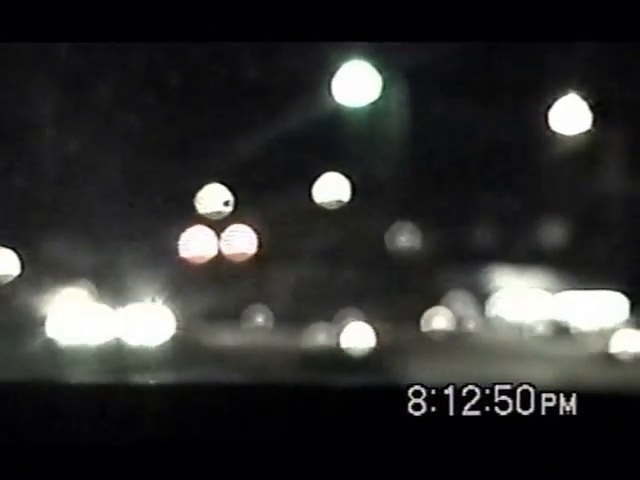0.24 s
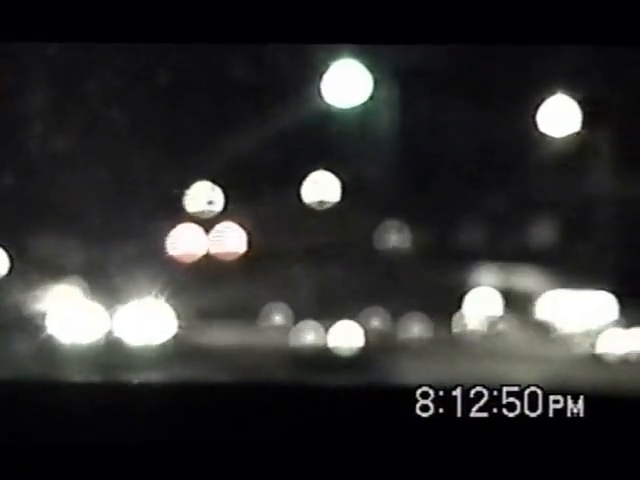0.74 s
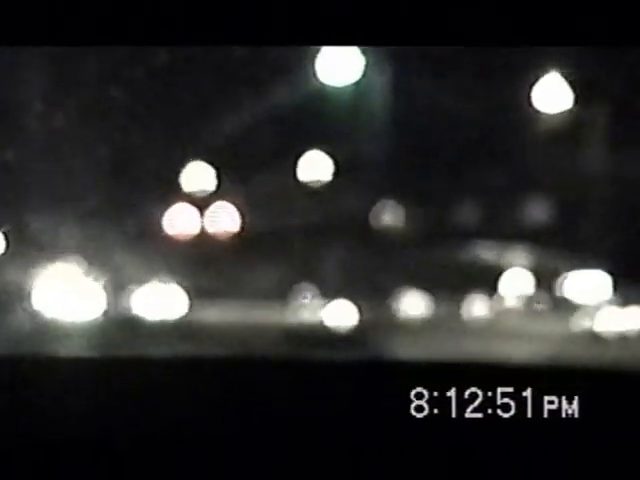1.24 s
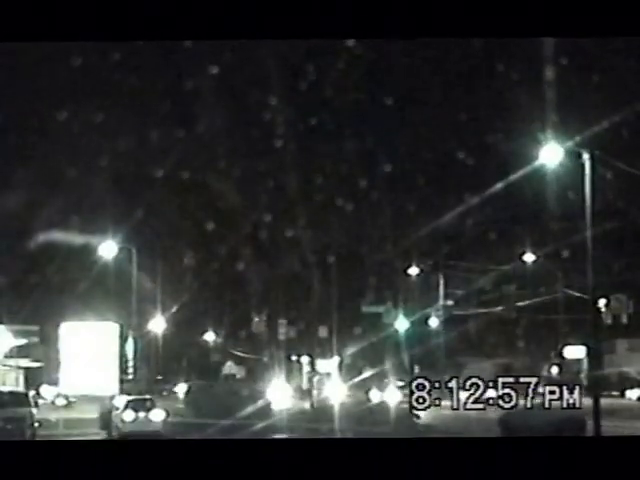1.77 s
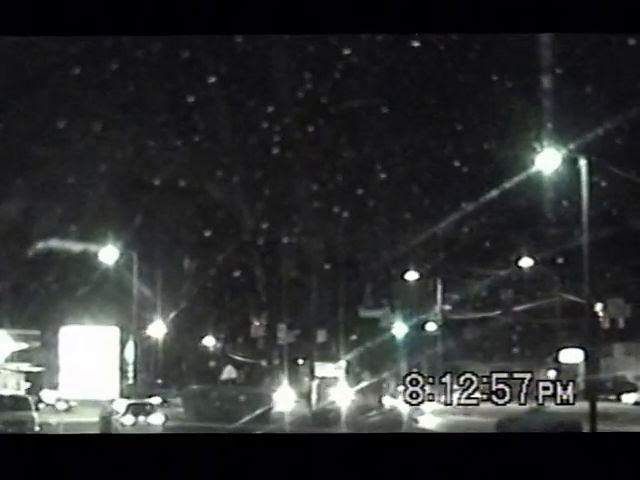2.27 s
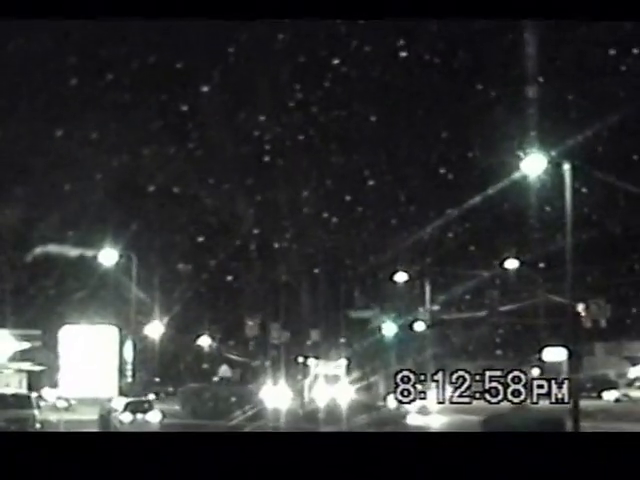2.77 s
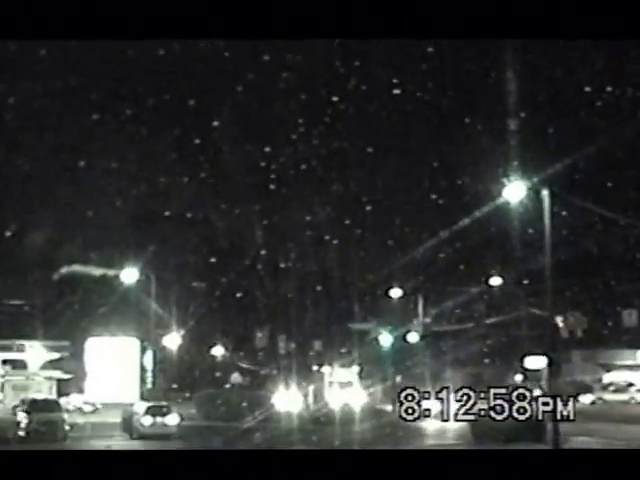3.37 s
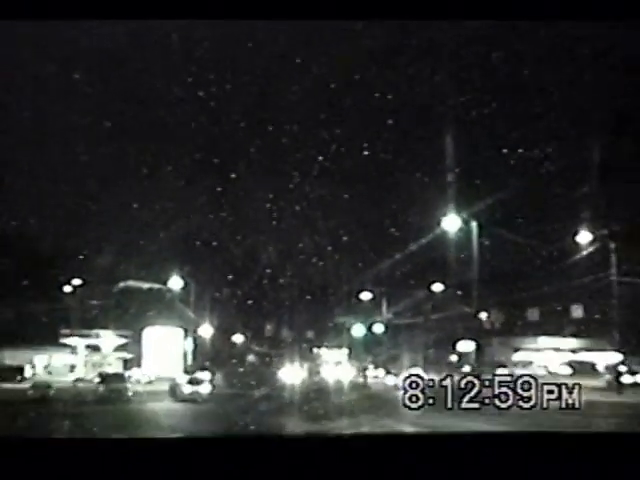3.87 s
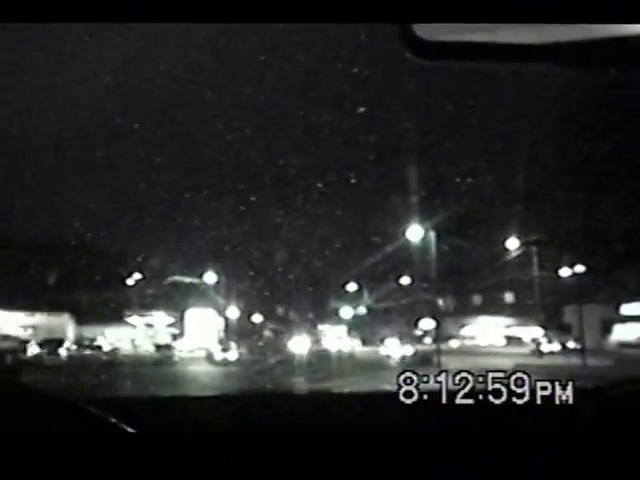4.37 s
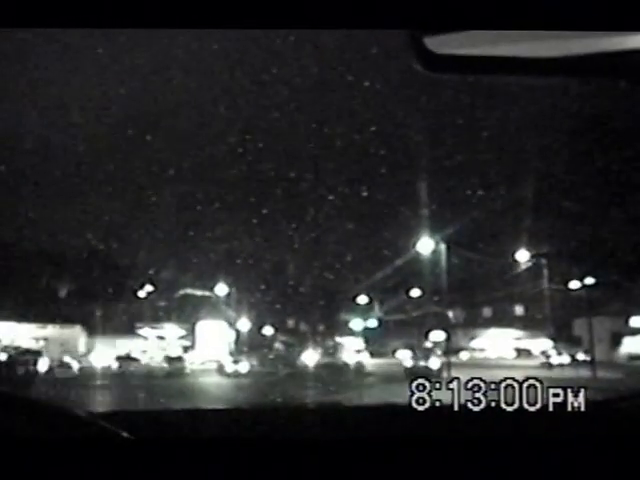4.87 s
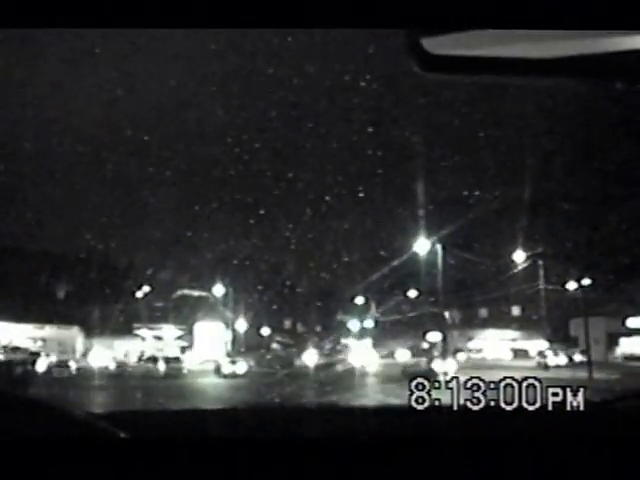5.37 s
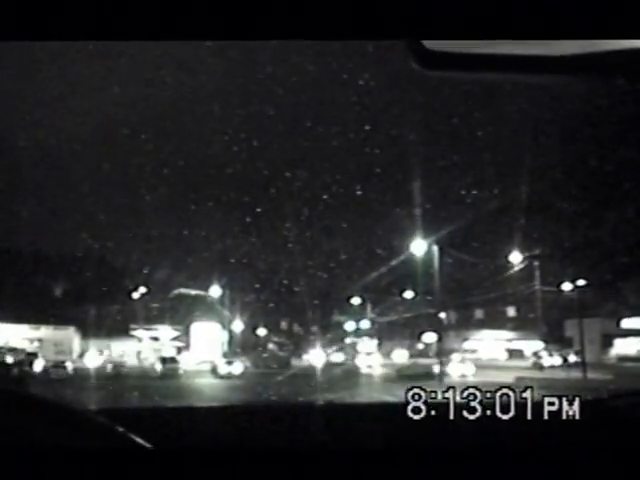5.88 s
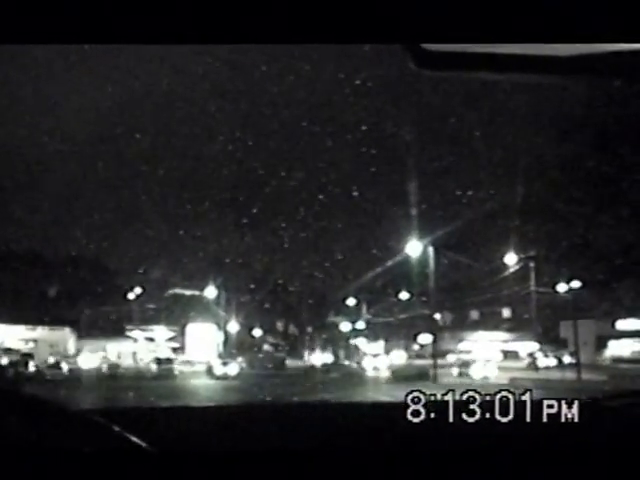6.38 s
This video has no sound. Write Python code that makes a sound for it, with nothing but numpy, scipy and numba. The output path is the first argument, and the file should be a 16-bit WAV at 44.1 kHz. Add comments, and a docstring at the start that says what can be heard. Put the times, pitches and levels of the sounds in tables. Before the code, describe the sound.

Inside a moving car, loud even road roar covers an easing engine hum. Light finger clicks and a dull bump precede an abrupt cut to a quieter drive. The engine climbs and surges with a boomy drone, plastic trim ticks, and sharp clicks snap very close to the microphone near five seconds. Faint hiss and a very high whistle stay underneath.

```python
"""Loud road roar fills a car cabin over an engine hum that eases off; at 1.4 s a second drive takes over.
There the engine climbs and surges, booming at the body's resonances, and another car pulls away.
Road and tyre sounds are coloured noise; hums are sine phases; trim ticks are decaying noise bursts.
Finger clicks ring a plastic camera shell. The camera adds hiss and a whistle, and its gain control ducks."""
import sys
import numpy as np
from scipy import signal
from scipy.fft import rfft, irfft
from scipy.io import wavfile
from numba import njit

SR = 44100
rng = np.random.default_rng(int(sys.argv[2]) if len(sys.argv) > 2 else 0)


def persist_wave(psi):
    """Save psi, clipped to +-1, as 16-bit WAV."""
    counts = np.round(np.clip(psi, -1, 1) * 32767).astype(np.int16)
    wavfile.write(sys.argv[1], SR, np.atleast_2d(counts).T)


N = 291799
TIME = np.arange(N) / SR
FREQ_HZ = np.arange(N // 2 + 1) * SR / N
CHANGE_S = 1.40  # first drive gives way to the second


def undb(db):
    """Decibels to amplitude gain."""
    return 10 ** (np.asarray(db) / 20)


def unit(x):
    """Scale to rms 1."""
    return x / np.sqrt(np.mean(x ** 2))


def curve(rows):
    """Second column of a table, interpolated over the time_s column to every sample."""
    time_s, value = np.transpose(rows)
    return np.interp(TIME, time_s, value)


def walk(rate_hz):
    """Random drift of rms 1: noise under a Gaussian low-pass about rate_hz wide, without DC."""
    lowpass = np.exp(-(FREQ_HZ / rate_hz) ** 2) * (FREQ_HZ > 0)
    return unit(irfft(rfft(rng.standard_normal(N)) * lowpass, N))


def gain_at(points, freq_hz):
    """Gain of a colour table, interpolated in dB over log frequency."""
    point_hz, level_db = np.transpose(points)
    return undb(np.interp(np.log(freq_hz + 1), np.log(point_hz), level_db))


def noise(points, standing=()):
    """Coloured noise of rms 1, with Gaussian peaks and dips for standing waves."""
    ripple_db = sum(db * np.exp(-((FREQ_HZ - hz) / width_hz) ** 2) for hz, width_hz, db in standing)
    spectrum = rfft(rng.standard_normal(N)) * gain_at(points, FREQ_HZ) * undb(ripple_db)
    return unit(irfft(spectrum, N))


def colour(x, points, size=512):
    """Minimum-phase colour filter, via the folded cepstrum, that keeps the power of white noise."""
    cepstrum = irfft(np.log(gain_at(points, np.arange(size // 2 + 1) * SR / size)))
    cepstrum[1:size // 2] *= 2
    cepstrum[size // 2 + 1:] = 0
    response = irfft(np.exp(rfft(cepstrum)))
    return signal.fftconvolve(x, response / np.linalg.norm(response))[:N]


def fade(t, t60_s):
    """Exponential decay, 60 dB down at t60_s."""
    return np.exp(-np.log(1000) * t / t60_s)


def swell(peak_s, attack_s, t60_s):
    """Linear rise to 1 at peak_s, then exponential decay."""
    rise = np.clip((TIME - peak_s) / attack_s + 1, 0, 1)
    return rise * fade(np.maximum(TIME - peak_s, 0), t60_s)


def strike(times_s, levels_db, response):
    """One scaled copy of a response at each time."""
    out = np.zeros(N + len(response))
    for time_s, level_db in zip(times_s, levels_db):
        i = int(time_s * SR)
        out[i:i + len(response)] += undb(level_db) * response
    return out[:N]


def electronics(hiss_db=-59, whistle_db=-64, swing_db=3.5, whistle_hz=15734, pulse_hz=12.6, pulse_depth=.45):
    """White preamplifier hiss, and a thin line-scan whistle, heard pulsing, that slowly swells and sinks."""
    swing = swing_db * np.cos(2 * np.pi * (TIME - .5) / 3.3)  # period 3.3 s
    level = undb(whistle_db + swing) * (1 + pulse_depth * np.sin(2 * np.pi * pulse_hz * TIME))
    whistle = np.sqrt(2) * level * np.sin(2 * np.pi * whistle_hz * TIME)
    return whistle + undb(hiss_db) * rng.standard_normal(N)


# tyre hiss level: time_s, level_db
HISS_LEVEL = [(0, -76), (3.2, -69), (4.7, -59), (5.05, -59.5), (5.9, -54), (6.62, -61)]
# tyre hiss colour: freq_hz, level_db
HISS_COLOUR = [(3000, -17), (5500, -12.5), (7100, -10), (8400, 0), (9400, 1.5), (10800, -6.5), (14000, -15)]


def tyre_hiss(flicker_db=2.0):
    """Thin high noise from the tyres, swelling along its level curve and flickering."""
    return noise(HISS_COLOUR) * undb(curve(HISS_LEVEL) + flicker_db * walk(23))


# cabin standing waves at the seat, peaks and dips: freq_hz, width_hz, level_db
STANDING_WAVES = [(368, 19.5, 3.5), (501, 28, -3), (668, 15, -10), (773, 24, 5.5), (912, 46, -4),
                  (941, 27, 5.5), (1132, 24, -14.5), (1285, 34, 3), (1856, 33, -6), (2486, 100, 3),
                  (2710, 95, -3), (3460, 270, 1)]
# floor rumble colour: freq_hz, level_db
RUMBLE_COLOUR = [(15, -34), (30, -8), (46, -4), (70, -6.5), (95, -12), (120, -3.5), (155, 2.5), (205, -4.5),
                 (240, -12.5), (330, -31), (600, -66)]


def road(roar_colour, roar_db, rumble_db, patchy_db, bumps_db):
    """Tyres on uneven asphalt: patchy roar through the glass, lumpy rumble through the floor."""
    roar = noise(roar_colour, STANDING_WAVES) * undb(roar_db + patchy_db * walk(23))
    rumble = noise(RUMBLE_COLOUR) * undb(rumble_db + bumps_db * walk(2.8))
    return roar + rumble


# cabin resonances rung by the road, levels relative: freq_hz, width_hz, level_db
CABIN_MODES = [(200.5, 6.4, -2.5), (311, 40, -9.5), (424, 24, -6.5), (537, 19, -6), (599, 9.3, -7),
               (663.8, 16.5, -2), (747.5, 13, -10)]


def cabin(level_db):
    """Road shake, as white noise, rings narrow cabin resonances."""
    rings = 0
    for hz, width_hz, mode_db in CABIN_MODES:
        b, a = signal.iirpeak(hz, hz / width_hz, SR)
        ring = unit(signal.lfilter(b, a, rng.standard_normal(N)))
        rings = rings + undb(mode_db) * ring
    return unit(rings) * undb(level_db)


def other_car(start_s=1.45, start_hz=81.3, end_hz=94, climb_s=0.61, level_db=-33, t60_s=5.3, wander=.004):
    """Second car pulling away: its hum climbs towards cruising pitch and fades with distance."""
    hz = end_hz + (start_hz - end_hz) * np.exp(-np.maximum(TIME - start_s, 0) / climb_s)
    phase = 2 * np.pi * np.cumsum(hz * (1 + wander * walk(12.3))) / SR
    return np.sqrt(2) * undb(level_db) * swell(start_s, .05, t60_s) * np.sin(phase)


# louder trim ticks, levels relative: start_s, level_db
LOUD_TICKS = [(1.591, -29.5), (1.7783, -39), (2.101, -40), (2.1369, -41), (2.1706, -39.5), (2.3634, -37.5),
              (3.0841, -40), (3.5519, -35), (3.9959, -39), (4.1069, -34.5), (4.2222, -39.5), (4.3504, -34),
              (4.7432, -36), (5.4082, -33), (5.6931, -26), (5.9919, -37.5), (6.2566, -33), (6.5636, -37)]
# tick colour: freq_hz, level_db
TICK_COLOUR = [(200, -77), (800, 5.5), (1500, 5.5), (2600, -0.5), (4200, -4), (6000, -9), (9000, -14.5),
               (13000, -20), (16000, -35)]


def trim_ticks(crack_t60_s=0.017, tail_t60_s=0.11, tail_db=-4, offset_db=-2,
               faint_db=-42, scatter_db=1, count=6):
    """Loose plastic ticks further off, mostly cabin echo; faint ones fall at random times."""
    faint_s = rng.uniform(CHANGE_S, N / SR, count)
    faint = np.column_stack([faint_s, faint_db + scatter_db * rng.standard_normal(count)])
    start_s, level_db = np.vstack([LOUD_TICKS, faint]).T
    t = TIME[:SR // 6]
    burst = fade(t, crack_t60_s) + undb(tail_db) * fade(t, tail_t60_s)
    envelope = strike(start_s, level_db + offset_db, burst)
    return colour(envelope * rng.standard_normal(N), TICK_COLOUR)


def hand_rub(rub_s=1.285, rub_attack_s=.045, rub_t60_s=1.0, rub_db=-42, grain_db=3.0,
             bump_s=1.345, bump_attack_s=.013, bump_t60_s=0.21, bump_db=-23.5):
    """Skin dragging on plastic: a grainy rustle, then a dull bump of the camera."""
    grain = undb(rub_db + grain_db * walk(140))
    rustle = noise(TICK_COLOUR) * swell(rub_s, rub_attack_s, rub_t60_s) * grain
    bump = noise(RUMBLE_COLOUR) * swell(bump_s, bump_attack_s, bump_t60_s) * undb(bump_db)
    return rustle + bump


# camera shell modes, levels relative: freq_hz, level_db, t60_s
SHELL_MODES = [(727, -6.5, 0.014), (1473, -11, 0.035), (1535, -6, 0.027), (1747, -0.5, 0.024),
               (1849, -4.5, 0.023), (2360, -8, 0.015), (3280, -23.5, 0.033), (4030, -24, 0.026),
               (5440, -13.5, 0.011), (8030, -27, 0.039)]
# snap colour: freq_hz, level_db
SNAP_COLOUR = [(300, -14.5), (800, 7.5), (1300, 10.5), (2300, 2.5), (3300, 3.5), (4700, -1.5), (5600, -0.5),
               (6900, -2), (8000, 0.5), (9000, -3), (11000, -8), (15500, -51)]
# treble fizz colour: freq_hz, level_db
FIZZ_COLOUR = [(2000, -53), (5500, -6), (8200, -8), (9700, -7), (11000, 0.5), (11900, 5), (12700, -5),
               (13400, 1), (14200, -29), (15800, 4)]
# finger clicks on the camera, ring level relative: start_s, ring_db, snap_db, fizz_db
FINGER_CLICKS = [(1.2567, -23.5, -21.5, -21), (1.2660, -29, -31, -42), (1.2746, -22.5, -22.5, -40),
                 (1.2790, -33, -29, -35), (1.2964, -44, -26, -40), (4.9138, -14, -11.5, -40),
                 (4.9182, -4.5, -35, -40), (4.947, -8, -26, -4), (4.9536, -17, -9, -26),
                 (5.0094, -12.5, -23, -2), (5.0983, -25, -15, -25), (5.2883, -16, -12, -28),
                 (5.2916, -3, -13.5, -11), (5.316, -20, -7, -16), (5.3197, -3.5, -21, -14)]


def clicks(push_s=0.001, snap_t60_s=0.0087, tail_t60_s=0.057, tail_db=-16, ring_offset_db=3):
    """A push rings the plastic shell's modes; noise bursts give a bright snap and short cabin tail."""
    start_s, ring_db, snap_db, fizz_db = np.transpose(FINGER_CLICKS)
    t = TIME[:SR // 8]
    push = 1 - np.exp(-t / push_s)
    modes = sum(undb(db) * fade(t, t60_s) * np.sin(2 * np.pi * hz * t) for hz, db, t60_s in SHELL_MODES)
    burst = np.sqrt(push) * (fade(t, snap_t60_s) + undb(tail_db) * fade(t, tail_t60_s))
    snap = colour(strike(start_s, snap_db, burst) * rng.standard_normal(N), SNAP_COLOUR)
    fizz = colour(strike(start_s, fizz_db, burst) * rng.standard_normal(N), FIZZ_COLOUR)
    return strike(start_s, ring_db + ring_offset_db, push * modes) + snap + fizz


# car body transmission, booms and nulls of its standing waves: freq_hz, gain_db
BODY_GAIN = [(46, 4), (51, 2.5), (53.5, -7), (59, 7.5), (72, -11), (95, -11.5), (107, -2), (125, -0.5),
             (128.3, -11.5), (134, 1.5), (140, 0.5), (160, -0.5), (172, 2), (190, 3.5), (208, 1),
             (236, -12.5), (300, -14.5)]


def engine(speed, load, orders, wander, flutter_db, drift_db):
    """Sines at firing-rate multiples follow load, boom at body resonances and waver independently."""
    firing_hz, load_db = curve(speed), curve(load)
    phase = 2 * np.pi * np.cumsum(firing_hz * (1 + wander * walk(11.1))) / SR
    out = 0
    for multiple, order_db, growth in orders:
        waver_db = flutter_db * walk(27) + drift_db * walk(3.2)
        level = undb(order_db + growth * load_db + waver_db)
        body = gain_at(BODY_GAIN, multiple * firing_hz)
        out = out + level * body * np.sin(multiple * phase)
    return np.sqrt(2) * out


# first engine speed: time_s, firing_hz
SPEED_1 = [(0, 37.85), (.25, 38.4), (.55, 38.3), (1.0, 35.6), (1.2, 35.14), (1.4, 37.5)]
# first engine load: time_s, load_db
LOAD_1 = [(0, 1.5), (.32, -1), (.6, -13.5), (1.0, -11), (1.4, -7)]
# first engine orders, level at 0 dB load before the body: multiple, level_db, growth_db_per_db
ORDERS_1 = [(2, -35, -0.5), (3, -32.5, 0.16), (4, -27, 1.1), (7, -23.5, 1.5)]
# first roar colour: freq_hz, level_db
ROAR_1 = [(140, -16), (215, -19), (268, 4), (330, -7.5), (580, -4), (790, -8), (1300, -14), (1900, -22.5),
          (3400, -30), (4300, -37.5), (6200, -41), (8500, -52), (15000, -58)]


def first_drive():
    """Loud, even road roar over an engine that eases off; a hand shifts on the camera."""
    hum = engine(SPEED_1, LOAD_1, ORDERS_1, wander=0.0041, flutter_db=1.0, drift_db=2.7)
    tyres = road(ROAR_1, roar_db=-29.9, rumble_db=-32, patchy_db=0.67, bumps_db=2.5)
    return hum + tyres + cabin(level_db=-37) + hand_rub()


# second engine speed, a climb then two surges: time_s, firing_hz
SPEED_2 = [(1.4, 46.33), (2.45, 52.46), (3.1, 55.4), (4.45, 63.3), (4.85, 64.33), (5.13, 68.2),
           (5.55, 68.56), (5.75, 74.86), (5.94, 72.24), (6.08, 64.8), (6.2, 66.4), (6.38, 77.2),
           (6.48, 79.1), (6.62, 72.6)]
# second engine load: time_s, load_db
LOAD_2 = [(1.4, -21), (2.2, -16), (2.5, -10.5), (4.0, -14), (4.25, -3), (4.5, -4), (4.9, -7.5),
          (5.15, -1.5), (5.55, 0.5), (5.72, -1), (5.92, 2), (6.079, -6), (6.2, 0.5), (6.33, -4.5),
          (6.48, 0), (6.62, -8)]
# second engine orders, level at 0 dB load before the body: multiple, level_db, growth_db_per_db
ORDERS_2 = [(1, -42.5, -0.16), (2, -20.5, 1.31), (3, -27.5, 1.36), (4, -38, .1)]
# second roar colour: freq_hz, level_db
ROAR_2 = [(140, -13.5), (245, 3.5), (320, -0.5), (600, -1), (790, -2.5), (1300, -8.5), (1900, -14.5),
          (3400, -22.5), (4700, -29.5), (6200, -28.5), (8000, -33.5), (15000, -62)]
# road noise growing with speed: time_s, rise_db
RISE_2 = [(1.4, 0), (3.1, 0.5), (3.8, 1.4), (5.1, 4), (5.8, 6.5), (6.62, 7)]
# floor rumble: time_s, level_db
RUMBLE_2 = [(1.4, -32.5), (3.4, -32), (5.0, -35), (6.0, -26.5), (6.25, -32.5), (6.62, -24)]


def second_drive(roar_growth=0.5, ring_growth=1.79):
    """Engine climbs; roar and cabin rings grow by so many dB per dB of road rise; rough parts rumble."""
    rise_db = curve(RISE_2)
    hum = engine(SPEED_2, LOAD_2, ORDERS_2, wander=0.0048, flutter_db=1.7, drift_db=1.0)
    tyres = road(ROAR_2, roar_db=-38.5 + roar_growth * rise_db, rumble_db=curve(RUMBLE_2),
                 patchy_db=0.84, bumps_db=1.5)
    return hum + other_car() + tyres + cabin(level_db=-44.0 + ring_growth * rise_db)


def scene(dissolve_s=0.014):
    """Equal-power dissolve between the two drives, with the small sounds on top."""
    share = np.clip((TIME - CHANGE_S) / dissolve_s + .5, 0, 1)
    drive = np.sqrt(1 - share) * first_drive() + np.sqrt(share) * second_drive()
    return (drive + tyre_hiss() + clicks() + trim_ticks() + electronics())[None]


@njit
def follow(x, attack, release):
    """Level follower with separate rise and fall coefficients per sample."""
    out, e = np.empty(len(x)), 0.
    for i in range(len(x)):
        e += (x[i] - e) * (attack if x[i] > e else release)
        out[i] = e
    return out


def record(dry, threshold_db=-20.5, attack_s=0.007, release_s=0.16, sense_hz=900, ceiling=.75, top_hz=15900):
    """Treble-sensing gain control ducks after loud clicks; peaks are rounded and the top is cut."""
    sense = signal.butter(1, sense_hz, "high", fs=SR, output="sos")
    sensed = signal.sosfilt(sense, dry[0])
    level = follow(np.abs(sensed), 1 / (attack_s * SR), 1 / (release_s * SR))
    ducked = dry * np.minimum(1, undb(threshold_db) / (level + 1e-9))
    rounded = ducked / (1 + (ducked / ceiling) ** 4) ** .25
    lowpass = signal.ellip(10, .2, 80, top_hz, fs=SR, output="sos")  # ripple .2 dB, stop 80 dB
    return signal.sosfilt(lowpass, rounded)


dry = scene()
out = record(dry)
persist_wave(out)
```